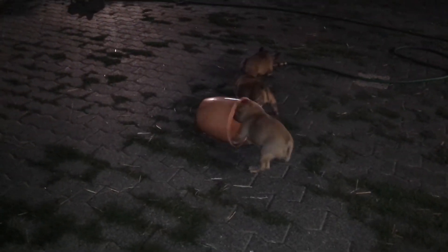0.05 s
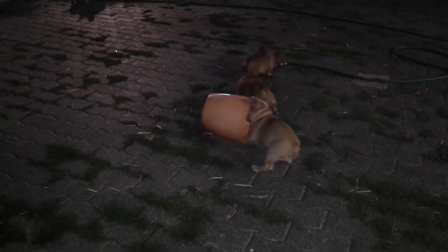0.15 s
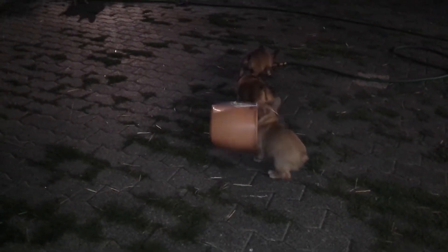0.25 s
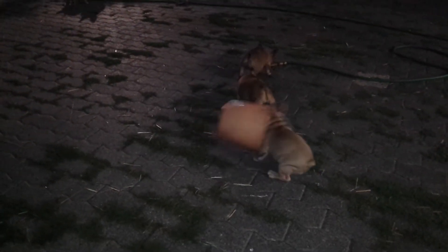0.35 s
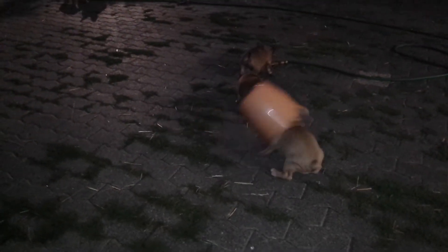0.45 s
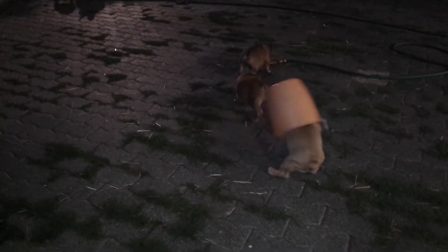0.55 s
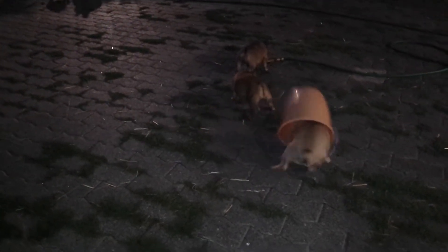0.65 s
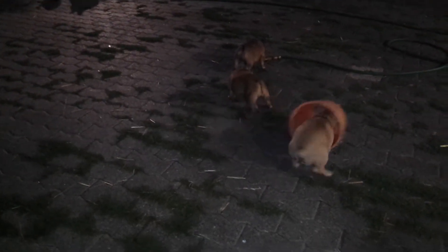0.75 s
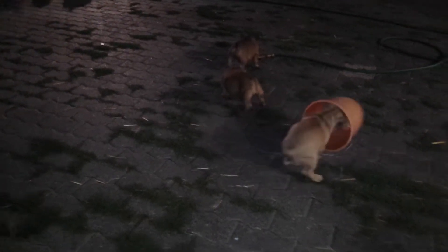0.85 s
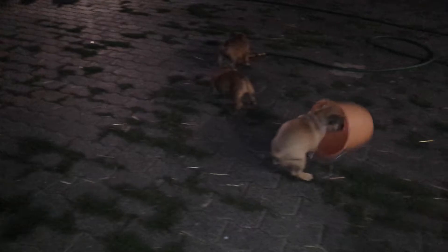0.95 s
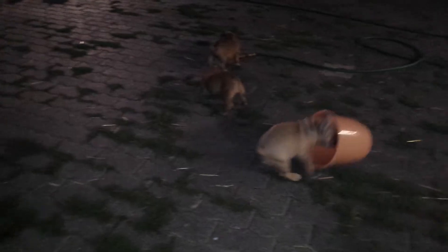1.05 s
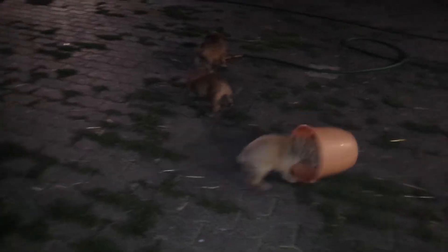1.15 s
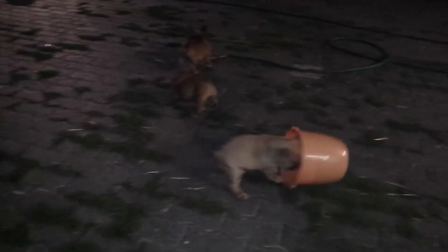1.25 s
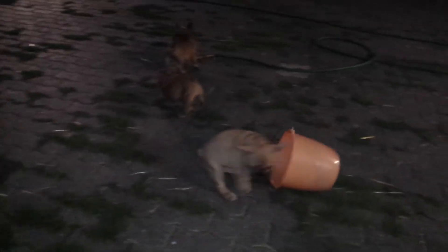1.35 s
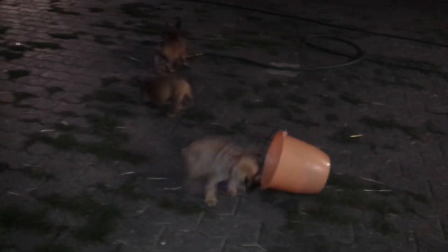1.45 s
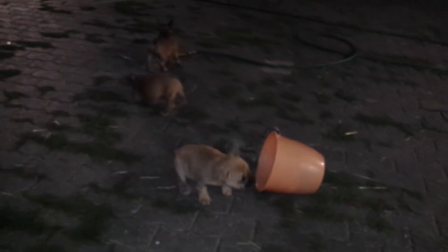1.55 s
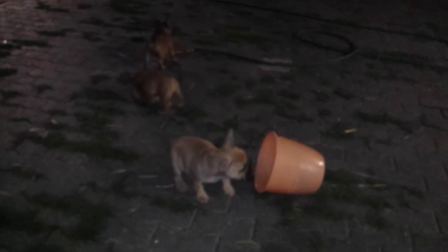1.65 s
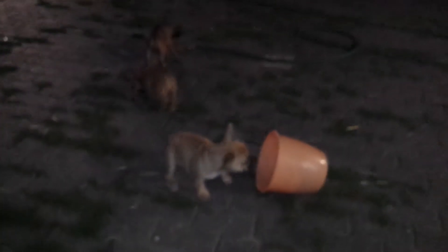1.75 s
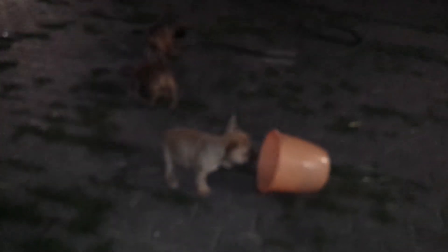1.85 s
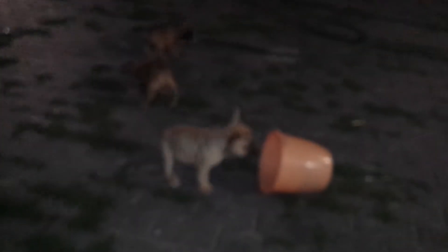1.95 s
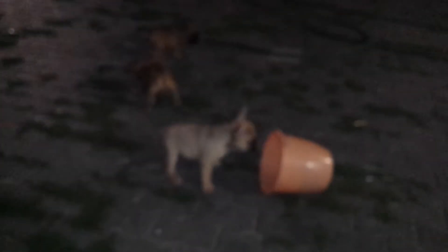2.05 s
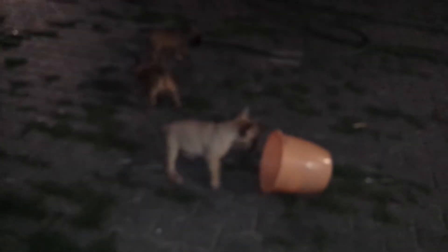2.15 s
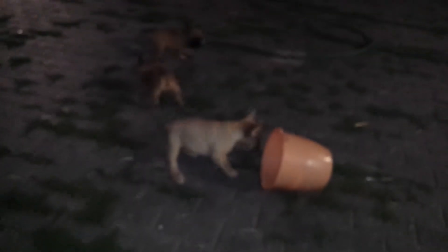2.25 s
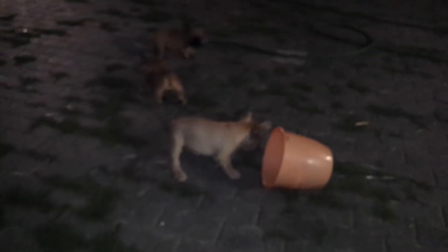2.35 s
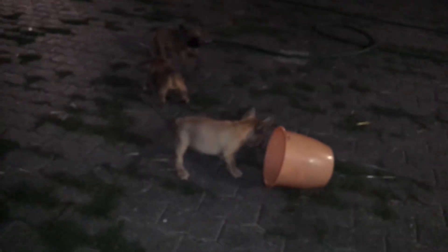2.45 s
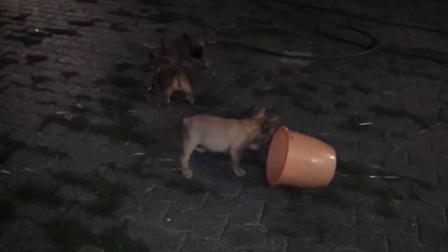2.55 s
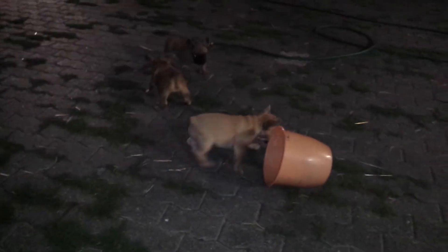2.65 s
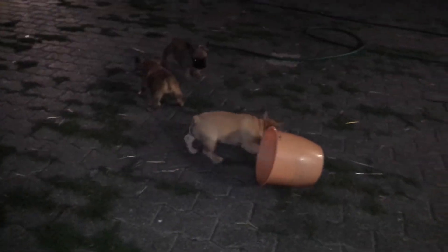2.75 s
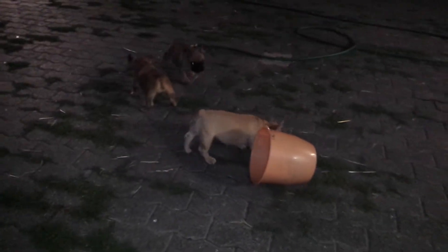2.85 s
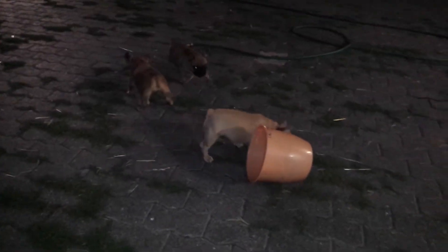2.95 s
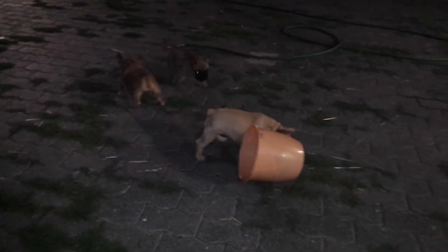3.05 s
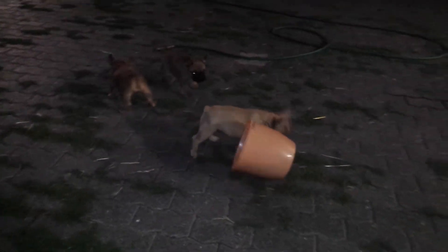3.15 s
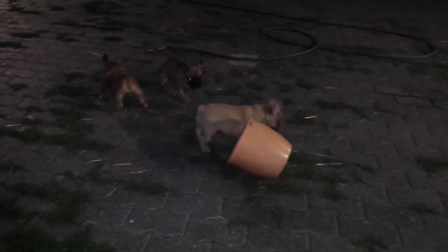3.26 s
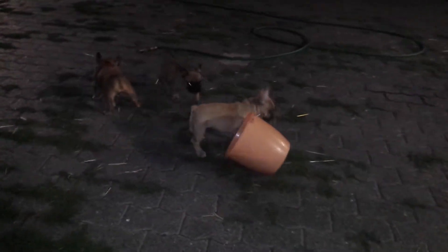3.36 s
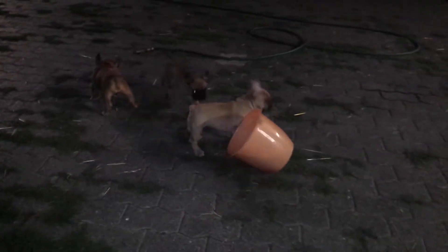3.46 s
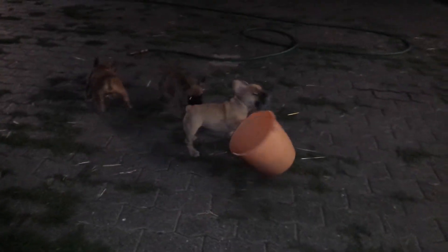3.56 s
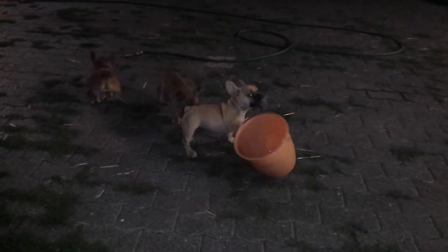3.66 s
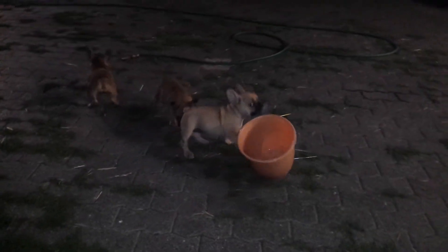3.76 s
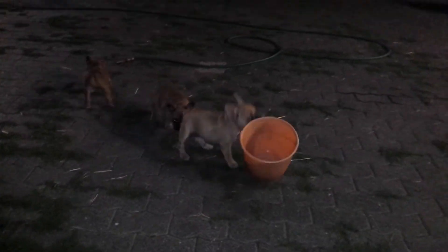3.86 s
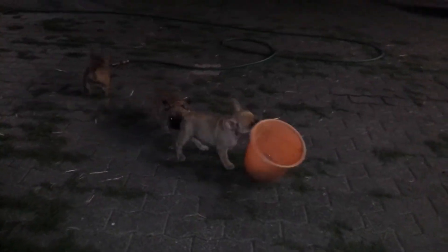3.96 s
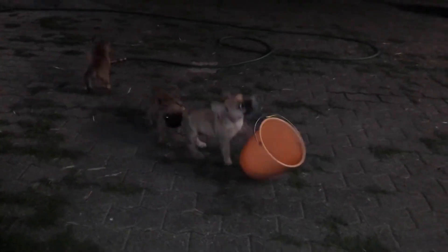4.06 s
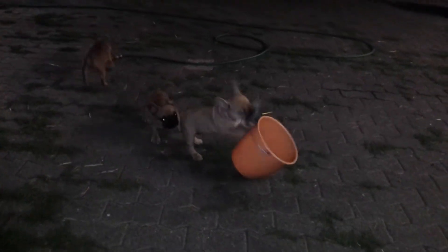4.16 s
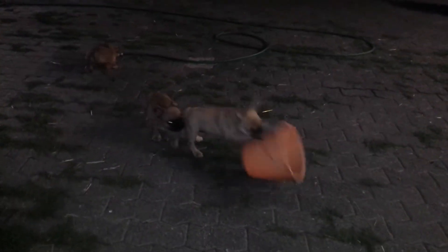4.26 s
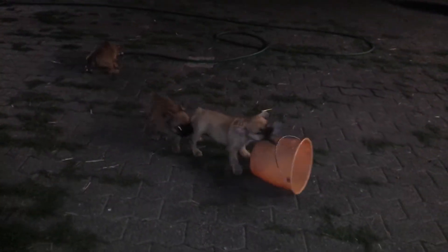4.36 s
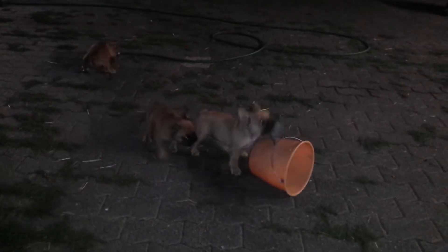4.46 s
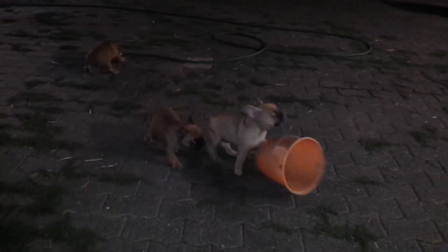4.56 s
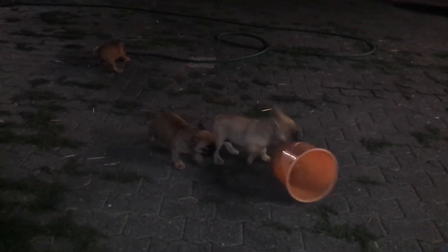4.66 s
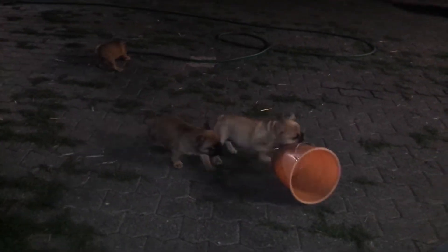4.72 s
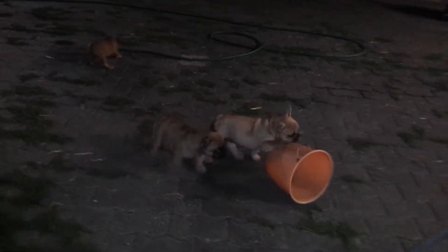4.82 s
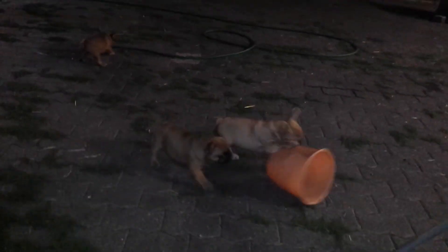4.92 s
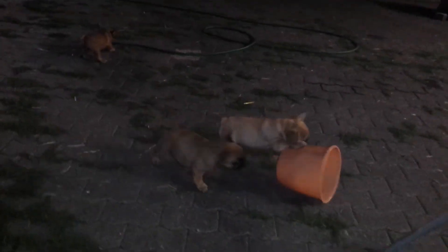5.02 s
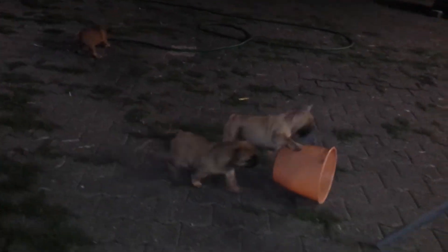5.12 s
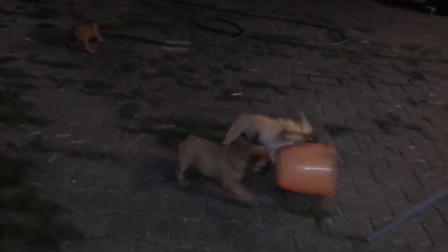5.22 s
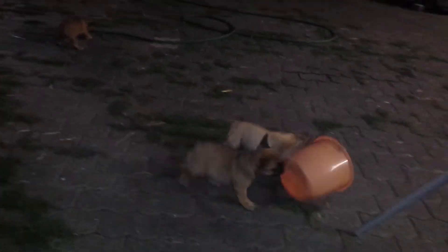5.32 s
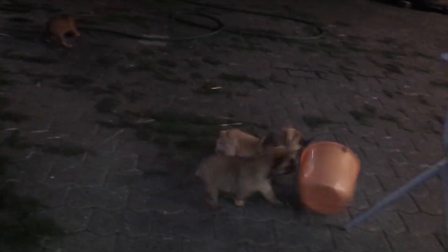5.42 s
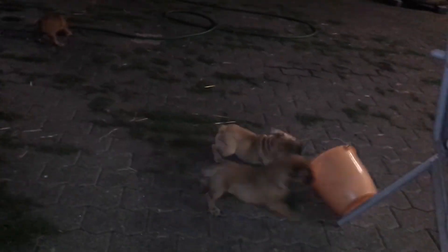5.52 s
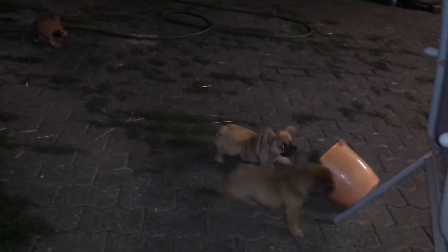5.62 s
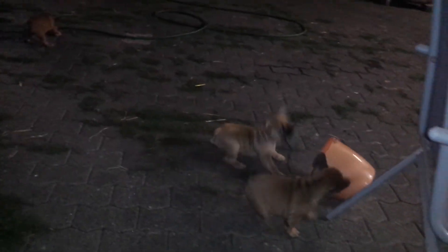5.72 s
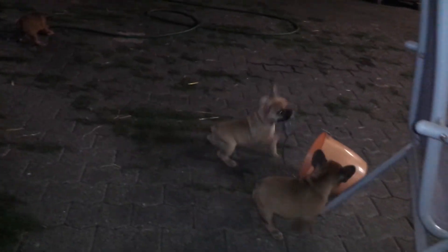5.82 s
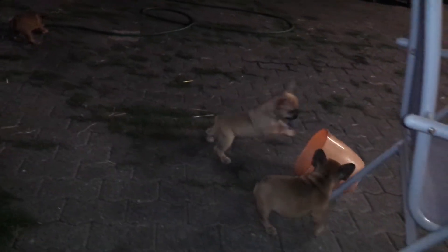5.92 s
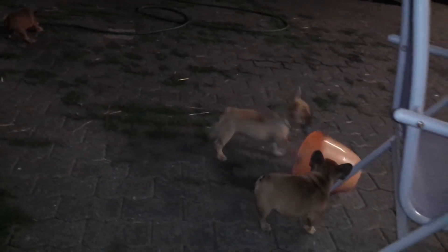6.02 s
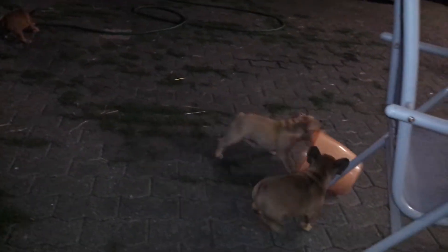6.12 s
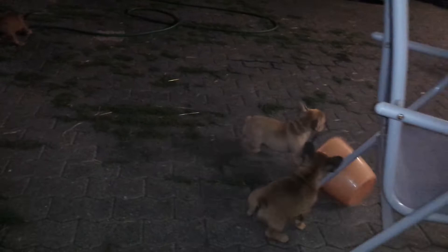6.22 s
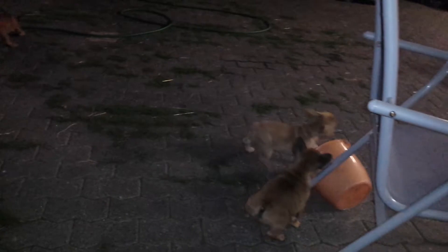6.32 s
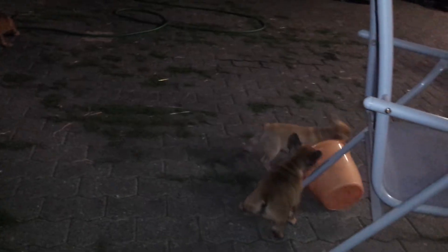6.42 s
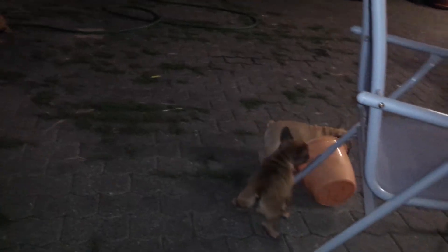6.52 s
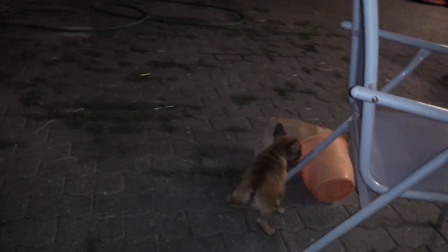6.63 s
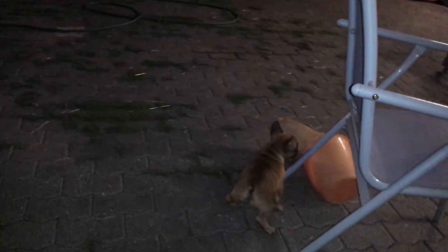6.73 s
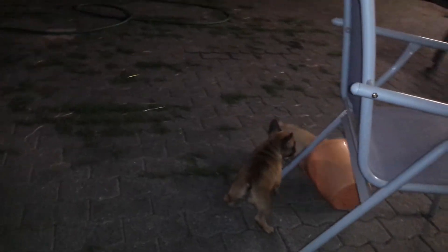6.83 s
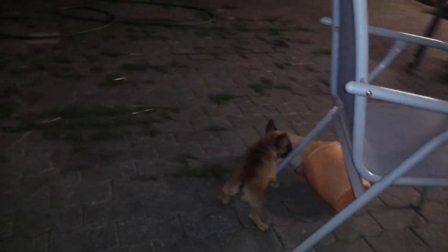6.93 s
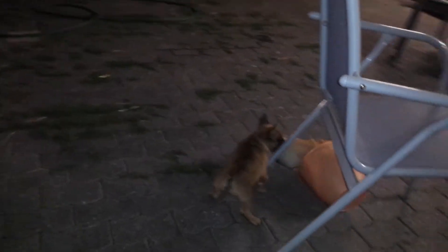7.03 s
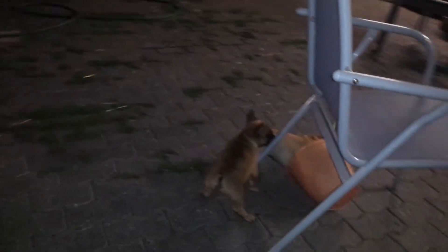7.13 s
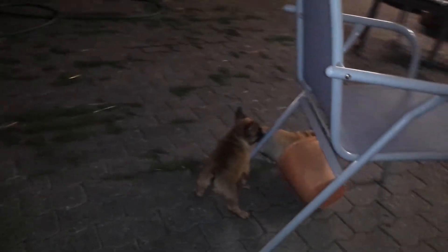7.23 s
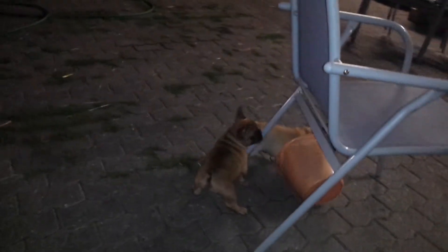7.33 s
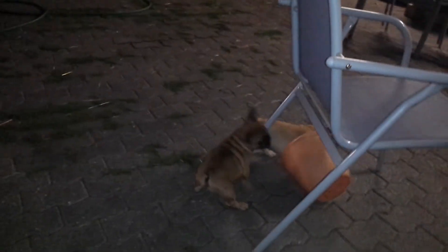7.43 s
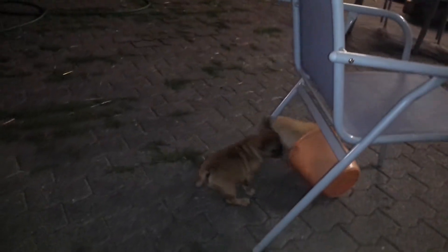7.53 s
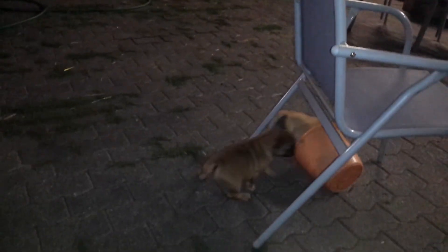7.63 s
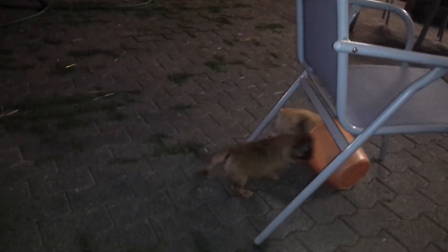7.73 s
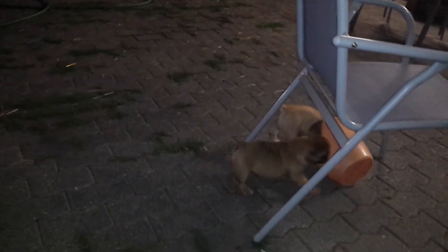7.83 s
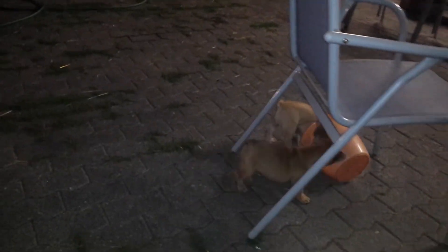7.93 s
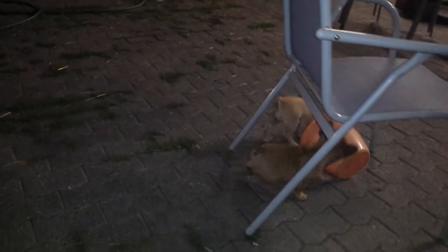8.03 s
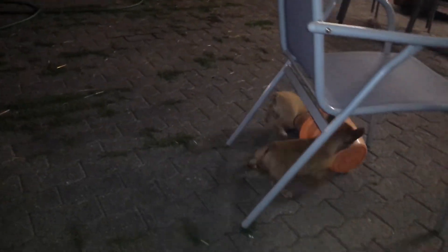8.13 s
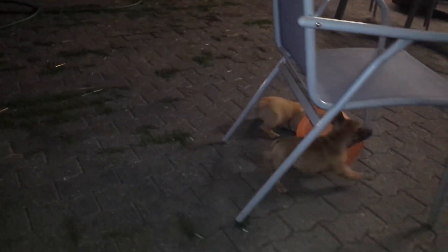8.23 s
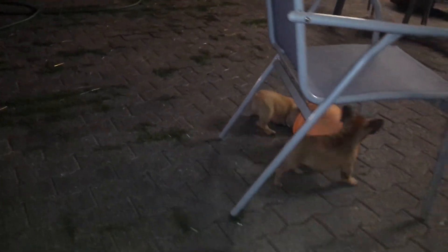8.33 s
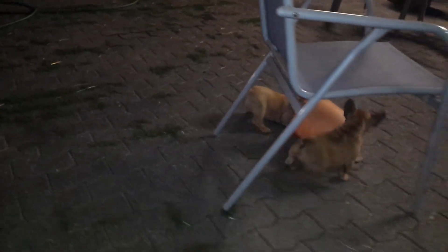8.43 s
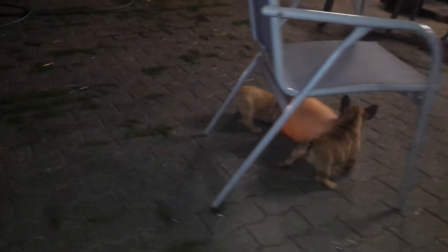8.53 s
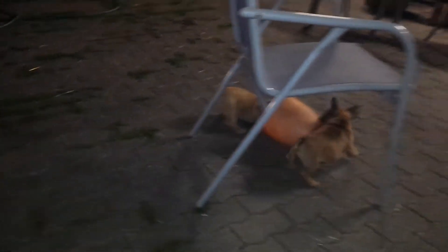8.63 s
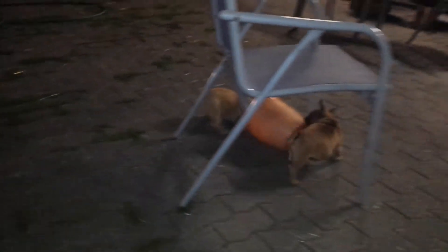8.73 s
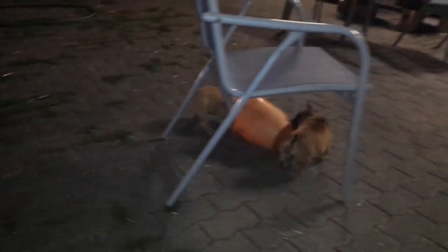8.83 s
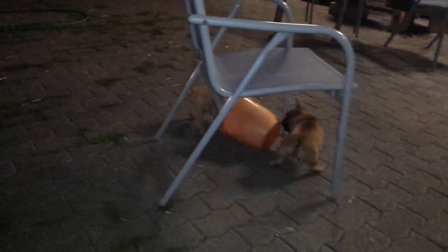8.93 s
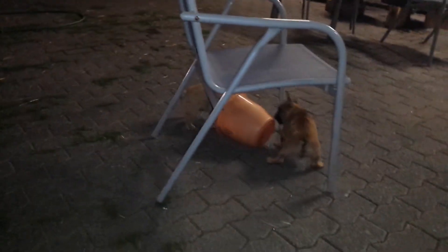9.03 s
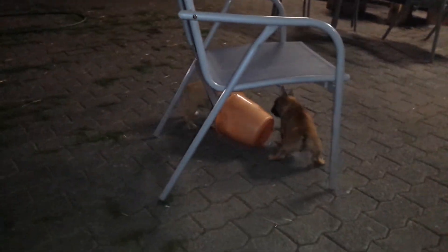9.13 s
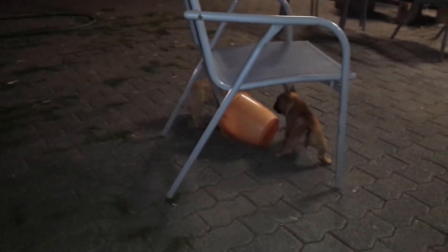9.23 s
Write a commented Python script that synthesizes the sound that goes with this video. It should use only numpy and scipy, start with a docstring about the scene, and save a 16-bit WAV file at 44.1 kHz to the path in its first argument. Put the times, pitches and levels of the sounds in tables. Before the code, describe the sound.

Close handheld stereo, one side muffled and the other bright: a light, hollow plastic pot bumps and drags over gritty paving stones. An opening clatter with deep drum-like pops gives way to soft scuffing and ticking claws, then a longer run of crowded knocks and harsh scrapes, thinning out to small taps. Still night air, low distant motor hum and brief wall reflections surround it.

```python
"""A patio at night, still air and a distant motor's hum; puppies shove a plastic flower pot over the paving.
First the pot clacks, scrapes and booms for some 1.4 s; then a lull of scuffs, ticks and a few knocks until 3.5 s.
From 4 s knocks and scrapes crowd together; the hum sinks after 8.25 s, and claws tick on past the last knock at 9 s.
Impulses ring modes of the pot, slips make its scrape, noise makes cracks and grit, and patio walls echo it all.
The left microphone is muffled, the right one bright."""
import sys
import numpy as np
from scipy import signal
from scipy.fft import rfft, irfft
from scipy.io import wavfile
from scipy.ndimage import uniform_filter1d

SR = 44100
rng = np.random.default_rng(int(sys.argv[2]) if len(sys.argv) > 2 else 0)


def dump(signal):
    """Clip the signal to [-1, 1] and save it as 16-bit WAV at the path in sys.argv[1]."""
    limited = np.clip(np.atleast_2d(signal).T, -1, 1)
    pcm = np.round(limited * 32767).astype(np.int16)
    wavfile.write(sys.argv[1], SR, pcm)


N = 409248
TIME = np.arange(N) / SR

# Night air. Each row: frequency in Hz, relative spectral level in dB per Hz.
AIR_SPECTRUM = [(15, -11), (45, -42), (75, -2), (120, 1.5), (200, -5.5), (300, -7.5), (450, -10),
                (900, -11), (1700, -19), (3500, -15), (5500, -12.5), (8000, -14), (15000, -13)]
# Partials of the distant motor. Each row: frequency in Hz, level in dB before the motor's level curve.
MOTOR_PARTIALS = [(113, -65.5), (169.5, -53.5), (339, -69.5)]
# The motor runs, then sinks. Each row: time in seconds, change of level in dB.
MOTOR_CURVE = [(0, 5), (2, 1), (3.5, 5), (7.9, 5), (8.25, 5), (8.5, -26), (9.28, -22)]
# Rumble of the hand on the camera. Each row: time in seconds, level in dB.
HAND_RUMBLE = [(0, -55), (1.2, -68), (2.3, -73), (3.2, -56.5), (4.2, -60), (5.5, -55), (6.2, -60),
               (7.4, -55), (8.2, -52.5), (8.8, -54), (9.28, -52)]
# Reverberation of the patio. Each row: frequency in Hz, time to fall 60 dB in seconds.
PATIO_DECAY = [(150, 0.72), (500, 0.45), (1500, 0.45), (4000, 0.44), (8000, 0.36), (15000, 0.49)]

# Paws and loose grit brush the paving. Each row: middle in seconds, length in seconds, level in dB, centre in Hz.
PAW_SCUFFS = [(0.331, 0.045, -25, 5260), (1.04, .04, -42, 11970), (1.783, .074, -53, 10000),
              (2.453, 0.069, -45, 3360), (2.565, .046, -48, 5100), (2.834, 0.033, -39, 10500),
              (2.993, 0.034, -36, 9900), (3.126, .016, -43, 1600), (3.345, .03, -33, 11000),
              (3.57, .066, -45, 1190), (3.693, 0.011, -41, 4600), (3.81, 0.1, -41, 9000),
              (4.15, 0.1, -37, 9000), (5.048, 0.12, -38, 5900), (6.53, 0.27, -42, 7700),
              (7.445, .14, -38.5, 7950), (7.888, 0.077, -42, 11000), (8.054, 0.082, -33.5, 9900),
              (8.428, 0.18, -38, 9250), (8.846, 0.054, -41.5, 7450), (9.091, 0.026, -41.5, 5100)]
# Claws and grit on the paving. Each row: start in seconds, level in dB before the layer trim.
CLAW_TICKS = [(.69, -40), (1.034, -44), (1.838, -46), (2.907, -40), (3.176, -35.5), (3.679, -31),
              (3.784, -30), (3.829, -32), (4.242, -29), (4.369, -28.5), (4.495, -30), (4.848, -26.5),
              (6.018, -34.5), (7.381, -37), (8.354, -33), (9.138, -38.5), (9.169, -38), (9.214, -34)]
# Bright snap of claw or grit. Each row: frequency in Hz, relative spectral level in dB per Hz.
TICK_SPECTRUM = [(600, -27), (1500, -3.5), (3000, 2.5), (5000, 0.5), (8000, 0.5), (12000, 0.5),
                 (16000, -5.5)]
# Treble crack of rim on stone. Each row: frequency in Hz, relative spectral level in dB per Hz.
CRACK_SPECTRUM = [(1500, -32), (2400, -26), (3100, 6), (4100, 2.5), (4900, 2), (5600, -7), (7500, -6),
                  (10000, -10.5), (15000, -38.5)]

# The base flexes and booms. Each row: start in seconds, level in dB, pitch in Hz, shift of the overtones in dB,
# time to fall 60 dB in seconds.
BASE_BOOMS = [(.196, -26, 199, -6, 0.084), (.458, -26, 194.5, 10, 0.12), (.749, -30.5, 195, -3, 0.24),
              (.837, -4.5, 198.8, -3, 0.13), (0.947, -24.5, 195, 7, 0.049), (1.088, -9, 205.5, -1, .16),
              (1.179, -3.5, 192, -5.5, 0.041), (1.254, -26, 184.5, 10, 0.11),
              (4.074, -27.5, 192, -27, 0.17), (4.59, -7.5, 234, -31, 0.067), (4.617, -15.5, 221, -4, .11),
              (4.954, -36, 201, 14, 0.13), (5.31, -34, 175, -9, 0.088), (5.55, -25, 198.6, 4, 0.12),
              (5.6, -13, 193.5, 3, 0.13), (6.028, -31.5, 199, -9, 0.22), (6.95, -25, 195, 5, .22),
              (7.278, -24.5, 178, -7, .087)]
# Air and base modes in a boom. Each row: multiple of its pitch, level in dB before the boom's own shift.
BOOM_OVERTONES = [(1.73, -5.5), (1.957, -5.5), (2.3, -40), (3.14, -26)]
# Modes of the pot's wall. Each row: frequency in Hz, height of the resonance in dB.
POT_MODES = [(200, 8), (290, -6), (345, 2.5), (395, 2.5), (480, -5), (560, -4.5), (640, 1), (730, -0.5),
             (830, -6.5), (980, -3.5), (1110, 3.5), (1240, 1.5), (1430, -8), (1610, 3), (1760, -1.5),
             (1880, -1), (2050, -8.5), (2230, 2), (2450, 0.5), (2700, -8), (2950, -5)]
SPLIT_HZ = 900  # parts the thud from the clack
RING_CYCLES = 22  # soft plastic loses 60 dB in this many swings

# Registers of the wall in Hz; which one rings most depends on where it touches the stone.
DEEP, LOW, MID, HIGH, SHARP = 850, 1080, 1470, 1820, 2230
# A puppy shoves the pot along. Each row: start in seconds, push in seconds, slide in seconds, rasp in dB,
# rumble above the rasp in dB, grit above the rasp in dB, register in Hz, share of that ring from 0 to 1;
# the three levels stand before the layer trims.
POT_SHOVES = [(0, .06, .04, -31, -1, -3, MID, 0.13), (0.178, .02, 0.033, -31.5, 1.5, -10, LOW, 0),
              (.322, .012, .1, -20.5, -1.5, -2, SHARP, 0.02), (.742, .012, .06, -29, -10, -6, MID, 0),
              (1.109, .014, .04, -27, 1, -22, MID, 0.5), (1.364, .012, .05, -28, 1, -16, LOW, 0.63),
              (1.398, .03, .02, -22.5, -9, -12.5, LOW, 0.67), (3.47, .09, .06, -49, -4, 5, HIGH, 0.5),
              (3.821, 0.018, .02, -36.5, 1.5, -1, MID, 0.1), (4.091, .012, 0.12, -32.5, -5, -6, SHARP, 0.4),
              (4.29, 0.013, .04, -33, -10, 0.5, MID, 0.3), (4.435, .015, 0.062, -33, -7, -4, MID, 0.44),
              (4.522, .02, 0.044, -24.5, 0, 0.5, LOW, 0.14), (4.72, .03, .05, -18.5, -3.5, -1, MID, 0.25),
              (4.936, .022, .045, -22, -1.5, -1, MID, 0.4), (5.12, .08, .14, -32.5, 1.5, 1, DEEP, .05),
              (5.321, .015, .07, -18.5, -2, -6, DEEP, 0.01), (5.445, .055, .07, -14, -4.5, -0.5, MID, 0.4),
              (5.543, .02, .04, -15.5, 1, 1.5, SHARP, .5), (5.61, .04, .06, -19.5, 1.5, -3, HIGH, 0.1),
              (5.73, .04, .12, -41, 6.5, 4, SHARP, 0.3), (5.848, 0.014, .03, -35.5, -9, -6, DEEP, 0.3),
              (6.123, .012, 0.044, -18.5, -20, -4, MID, .4),
              (6.208, 0.016, .06, -16, -15, -7.5, DEEP, 0.83), (6.25, .04, .06, -20, -3.5, 1, LOW, 0.5),
              (6.3, .025, .06, -20, -4, -2.5, MID, 0.56), (6.403, 0.018, .14, -32, 0.5, 2.5, LOW, 0.2),
              (6.668, .012, .07, -31, -4, -3, SHARP, .4), (6.742, .028, .06, -27, -1, 6, LOW, 1),
              (6.805, .025, 0.11, -18.5, -6.5, 0, HIGH, 0.3), (6.86, .13, .17, -16, -6.5, -6.5, HIGH, 0.73),
              (7.06, .025, .18, -23.5, -14, -1, HIGH, 0.8), (7.42, .03, 0.17, -36.5, 5.5, 2, LOW, 0.12),
              (7.533, .017, .04, -26, -1, -6, LOW, 0.98), (7.86, .06, .25, -36, -3.5, -8, LOW, 0.65),
              (8.027, .018, .03, -29.5, -2, -2, LOW, 1), (8.155, .05, 0.041, -20, -5, -3, LOW, 0.5),
              (8.26, .03, .06, -41.5, 5, 5, LOW, 0.2), (8.398, .02, 0.044, -24.5, -4, -10, LOW, 0.63),
              (8.56, .016, .06, -39, -1, -3, DEEP, 0.8), (8.729, .09, .035, -37, -1, -5, DEEP, 0.72),
              (8.973, .033, .035, -29, -3.5, 0.5, HIGH, .1)]
# A shove grips in GRIP_S seconds, builds by BUILD_DB through the push and drops SLIDE_DB per slide length.
GRIP_S, BUILD_DB, SLIDE_DB = .009, 7, 20
# Bumps in the stone rattle a sliding pot: dB above the untrimmed rasp, and spread either way in dB.
RATTLE_DB, RATTLE_SPREAD_DB = -1.5, 2.5
# The pot knocks on stone. Each row: start in seconds, clack in dB, thud above the clack in dB,
# crack above the clack in dB, register in Hz; the levels stand before the layer trims.
POT_KNOCKS = [(.022, -21.5, -23, 7, SHARP), (.161, -31.5, -21, -2, MID), (.317, -25, -6, 2, SHARP),
              (.462, -18.5, -5, -7.5, DEEP), (.539, -20.5, -22, -12, SHARP), (.724, -23, -3.5, -3, SHARP),
              (.767, -25.5, -18, -20, LOW), (.837, -18.5, -17, -5, DEEP), (.958, -31.5, -7, -1, MID),
              (1.089, -16, -5.5, -2.5, LOW), (1.176, -21, -22, 1.5, MID), (1.202, -15.5, -8, -2.5, MID),
              (1.361, -21, -5.5, -4.5, LOW), (2.089, -29.5, -0.5, -2.5, DEEP),
              (3.237, -21.5, -1.5, -0.5, DEEP), (3.597, -34, -5, 1.5, DEEP), (3.606, -28, -9, -10, DEEP),
              (3.871, -24, -4, 2, SHARP), (4.067, -24, -15, -3, SHARP), (4.075, -17, -2.5, -2.5, SHARP),
              (4.11, -25.5, -17, 3.5, SHARP), (4.23, -25, -25, -3.5, HIGH), (4.265, -26, -0.5, 1.5, SHARP),
              (4.293, -23.5, -4, -8, MID), (4.408, -23.5, -7.5, -1, MID), (4.417, -26.5, -3, 4.5, LOW),
              (4.483, -26, -1, -14, DEEP), (4.592, -17.5, -4.5, -0.5, SHARP), (4.677, -18.5, -9, -1.5, MID),
              (4.715, -12.5, -14, -2.5, MID), (4.743, -17, -9, 0, MID), (4.824, -23.5, -6, -1.5, SHARP),
              (4.921, -18.5, -6.5, -3, MID), (5.11, -37, -5, 17.5, MID), (5.172, -27.5, 2, -8, DEEP),
              (5.233, -20, -2, 2.5, LOW), (5.267, -21.5, -4.5, 4, MID), (5.312, -15, -1, -2.5, MID),
              (5.339, -22.5, 8.5, -8, DEEP), (5.439, -18.5, -2.5, 0, DEEP),
              (5.483, -17.5, -23, -0.5, SHARP), (5.601, -10, -7, -1.5, MID), (5.941, -35, -2, 2.5, MID),
              (5.958, -26, -10.5, -7, DEEP), (6.1, -25.5, -6, 3, LOW), (6.121, -19, -0.5, 2, DEEP),
              (6.151, -19, -17, -7, MID), (6.211, -26, 2, 5, DEEP), (6.471, -21.5, -8, -8, MID),
              (6.487, -23.5, -10, 0.5, SHARP), (6.636, -35, 5.5, 10, MID), (6.655, -14.5, -32, -7.5, HIGH),
              (6.665, -17.5, -10.5, -7, SHARP), (6.757, -14.5, -9, -12, LOW), (6.799, -11, -23, -6, HIGH),
              (7.012, -20, -29, 0, HIGH), (7.06, -16, -11.5, -3, MID), (7.513, -23, -5, -3, SHARP),
              (7.518, -17.5, -17, 1, SHARP), (7.601, -27, -16, -10, HIGH), (7.745, -15.5, -18, -1, HIGH),
              (7.929, -29.5, -7, -2.5, LOW), (7.974, -26, -8, -11, SHARP), (8.051, -20.5, -18, -13, LOW),
              (8.079, -36.5, 6, 17.5, LOW), (8.128, -20, -5, -1.5, LOW), (8.282, -24.5, -6, -1.5, LOW),
              (8.401, -30, 0.5, 1, LOW), (8.436, -27, -4, -12, LOW), (8.572, -47, 3, -9, DEEP),
              (8.638, -37, 0, 8.5, LOW), (8.777, -51, 20, 12, DEEP), (8.9, -18, -4, 3, HIGH),
              (8.961, -23.5, -4.5, -17, LOW)]

# Left microphone, muffled. Each row: frequency in Hz, response in dB.
LEFT_MICROPHONE = [(200, 2), (700, -2.5), (1300, -5), (1600, -4.5), (1900, -4), (2400, -12.5),
                   (4400, -13.5), (8000, -19.5), (15000, -26)]
# Right microphone, bright. Each row: frequency in Hz, response in dB.
RIGHT_MICROPHONE = [(200, 2.5), (4000, -2), (5600, 5), (6700, 12), (8000, 3), (10000, -2.5), (15000, -7.5)]
EDGE_HZ = 15600  # upper band limit of both microphones


def gain_of(db):
    """Decibels to amplitude."""
    return 10 ** (np.asarray(db) / 20)


def evened(x):
    """Scales to rms 1."""
    return x / np.sqrt(np.mean(x ** 2) + 1e-20)


def peaked(x):
    """Scales the loudest 4 ms to rms 1."""
    power = uniform_filter1d(x ** 2, size=176, mode="constant")
    return x / np.sqrt(power.max() + 1e-20)


def read(points, hz):
    """Reads a table on a log-frequency axis."""
    f, value = np.transpose(points)
    return np.interp(np.log(hz + 1), np.log(f + 1), value)


def add(mix, s, sound):
    """Mixes a sound in at time s, cut off at the end of the mix."""
    part = mix[..., max(round(s * SR), 0):][..., :sound.shape[-1]]
    part += sound[..., :part.shape[-1]]


def colour(x, points, size=2048):
    """Minimum-phase filter with the given spectrum, made by folding its cepstrum into positive time."""
    spectrum = gain_of(read(points, np.fft.rfftfreq(size, 1 / SR)))
    cepstrum = irfft(np.log(spectrum))
    cepstrum[1:size // 2] *= 2
    cepstrum[size // 2 + 1:] = 0
    response = irfft(np.exp(rfft(cepstrum)))
    return np.apply_along_axis(signal.oaconvolve, -1, x, response)[..., :x.shape[-1]]


def wander(per_s):
    """Random drift of rms 1, with nothing quicker than per_s swings a second."""
    slow = np.fft.rfftfreq(N, 1 / SR) < per_s
    return evened(irfft(rfft(rng.standard_normal(N)) * slow, N))


def resonate(x, hz, width):
    """A resonance of gain 1 that follows the curve hz: shift down to zero, smooth, shift back."""
    turn = np.exp(2j * np.pi * np.cumsum(hz) / SR)
    r = np.exp(-np.pi * width / SR)
    return 2 * (turn * signal.lfilter([1 - r], [1, -r], x / turn)).real


def night(air_db=-51, drift=0.0038, shared_hz=600):
    """Still night air, its bass shared by both microphones, and the drifting hum of a distant motor."""
    hz = np.fft.rfftfreq(N, 1 / SR)
    z = rfft(rng.standard_normal((2, N))) * gain_of(read(AIR_SPECTRUM, hz))
    same = 1 / (1 + (hz / shared_hz) ** 2)
    z[0] = same * z[1] + np.sqrt(1 - same ** 2) * z[0]
    air = gain_of(air_db) * evened(irfft(z, N))
    clock = np.cumsum(1 + drift * wander(7.4)) / SR
    running_db = np.interp(TIME, *np.transpose(MOTOR_CURVE)) + .6 * wander(5)
    hum = sum(gain_of(db) * np.sqrt(2) * np.sin(2 * np.pi * f * clock) for f, db in MOTOR_PARTIALS)
    return air + gain_of(running_db) * hum


def handling(low_hz=55, high_hz=130):
    """Dull rumble of the hand on the camera: low band-passed noise on a level curve."""
    band = signal.butter(2, [low_hz, high_hz], "bandpass", fs=SR, output="sos")
    rumble = signal.sosfilt(band, rng.standard_normal(N))
    return gain_of(np.interp(TIME, *np.transpose(HAND_RUMBLE))) * evened(rumble)


def patio(x, gap_s=0.022, shared_hz=700):
    """Weak scatter from the ground, then stronger echoes from the walls; both microphones share the bass."""
    t = np.arange(SR * 2 // 3) / SR
    # about 3000 random reflections a second, none in the first 3 ms
    taps = rng.standard_normal((2, len(t))) * (rng.random((2, len(t))) < 3000 / SR)
    taps *= np.interp(t, [0, gap_s * .8, gap_s], [.45, .45, 1]) * (t > .003)
    hz, when, z = signal.stft(taps, SR, nperseg=256)
    same = (1 / (1 + (hz / shared_hz) ** 4))[:, None]
    z[0] = same * z[1] + np.sqrt(1 - same ** 2) * z[0]
    # each frequency dies away at its own rate
    fade = gain_of(-60 * when / read(PATIO_DECAY, hz)[:, None])
    tail = signal.istft(z * fade, SR, nperseg=256)[1]
    tail /= np.linalg.norm(taps[1] * gain_of(-60 * t / read(PATIO_DECAY, 1500)))
    return signal.fftconvolve(x[None], tail, axes=1)[:, :N]


def scuffs(octaves=0.85, grain_db=4, level_db=0):
    """Paws and grit brush the paving: short swells of grainy noise, each in its own band."""
    out = np.zeros((2, N))
    grains = rng.standard_normal((2, N)) * gain_of(grain_db * wander(340))
    for middle, length, db, hz in PAW_SCUFFS:
        start = middle - length / 2
        swell = np.hanning(round(length * SR))
        sand = grains[:, round(start * SR):][:, :len(swell)]
        offset = np.log2((np.fft.rfftfreq(len(swell), 1 / SR) + 1) / hz)
        band = np.exp(-.5 * (offset / octaves) ** 2)
        brush = evened(irfft(rfft(sand) * band, len(swell)))
        add(out, start, gain_of(db + level_db) * swell * brush)
    return out


def ticks(level_db=-1):
    """Tiny dry snaps of claws and loose grit: bright noise that falls 60 dB in 20 ms."""
    out, t = np.zeros((2, N)), np.arange(SR // 20) / SR
    fade = gain_of(-60 * t / .02)
    for s, db in CLAW_TICKS:
        snap = colour(rng.standard_normal((2, len(t))) * fade, TICK_SPECTRUM)
        add(out, s, gain_of(db + level_db) * peaked(snap))
    return out


def booms(rise_s=0.0035):
    """The base pops like a drum skin and rings the air in the pot: decaying sines."""
    out, t = np.zeros(N), np.arange(SR // 2) / SR
    for s, db, hz, over_db, t60 in BASE_BOOMS:
        ring = np.sin(2 * np.pi * hz * t)
        for multiple, mode_db in BOOM_OVERTONES:
            overtone = np.sin(2 * np.pi * (multiple * hz * t + rng.random()))
            ring = ring + gain_of(over_db + mode_db) * overtone
        envelope = gain_of(db - 60 * t / t60) * (1 - np.exp(-t / rise_s))
        add(out, s, -envelope * ring)
    return out


def wall(t, centre_hz=None, focus_db=0, detune=.035, spot_db=1.5, apart_hz=1900):
    """Low and high ring of the pot at both microphones; each contact spot weights and bends the modes."""
    hz, db = np.transpose(POT_MODES)
    bend, weight, sign, lag = rng.standard_normal((4, len(hz)))
    if centre_hz:
        db = db - focus_db * abs(np.log2(hz / centre_hz))
    start = np.sign(sign) * hz * gain_of(db + spot_db * weight)
    cycles = np.outer(hz * (1 + detune * bend), t)
    # short waves reach the two microphones out of step
    out_of_step = np.outer([1, 0], lag * hz / apart_hz)[:, :, None]
    fade = gain_of(-60 * cycles / RING_CYCLES)
    modes = start[:, None] * fade * np.sin(out_of_step + 2 * np.pi * cycles)
    low, high = modes[:, hz < SPLIT_HZ], modes[:, hz >= SPLIT_HZ]
    return np.array([low.sum(1), high.sum(1)])


def shoving(judder_db=2, judder_per_s=90, roll=0.027, roll_per_s=18):
    """Levels of rumble, rasp and grit as the pot is shoved; the strongest shove sets the ring and its share."""
    clock = TIME[::32]  # a coarse clock is enough for the slow levels
    start, push, slide, db, rumble_db, grit_db, hz, share = np.transpose(POT_SHOVES)[:, :, None]
    t = clock - start
    fall_db = BUILD_DB * np.maximum(1 - t / push, 0) + SLIDE_DB * np.maximum(t - push, 0) / slide
    force = np.clip(t / GRIP_S, 0, 1) * gain_of(db - fall_db)
    levels = [np.linalg.norm(force * gain_of(above), axis=0) for above in (rumble_db, 0, grit_db)]
    strongest = force.argmax(axis=0)
    curves = (*levels, hz[strongest, 0], share[strongest, 0])
    rumble, rasp, grit, hz, share = (np.interp(TIME, clock, curve) for curve in curves)
    # the pot judders on the uneven stone, and its ring shifts as it rolls
    judder = gain_of(judder_db * wander(judder_per_s))
    ring_hz = hz * np.exp(roll * wander(roll_per_s))
    return rumble * judder, rasp * judder, grit * judder, ring_hz, share


def scrape(rumble, rasp, grit, hz, share, slips_per_s=560, uneven_db=4.5, sand=0.71, spit=0.84,
           slip_s=0.0048, width_hz=290, rumble_db=-6.0, rasp_db=-2, grit_db=-5, count=8):
    """The rim sticks and slips over the stone; every slip taps one of several spots of the wall."""
    share = np.clip(share, 0, 1)
    turns = np.cumsum(slips_per_s * np.exp(.7 * wander(250))) / SR
    slips = np.diff(np.floor(turns), prepend=0)
    slips = slips * gain_of(uneven_db * np.clip(rng.standard_normal(N), -2, 2))
    spot, t = rng.integers(0, count, N), np.arange(SR // 10) / SR
    low, high = sum(signal.oaconvolve((slips * (spot == k))[None, None], wall(t), axes=2)[..., :N]
                    for k in range(count))
    # pressed hard, one part of the wall sings out
    kicks = np.sqrt(slips) * rng.choice([-1, 1], N)
    singing = resonate(resonate(kicks, hz, 2 * width_hz), hz, 2 * width_hz)
    high = np.sqrt(1 - share) * evened(high) + np.sqrt(share) * evened(singing)
    # each slip also crushes sand
    crushing = evened(signal.lfilter([1], [1, -np.exp(-1 / (slip_s * SR))], slips))
    grains = rng.standard_normal((2, 2, N))
    crushed = evened(colour((sand + crushing) * grains[0], CRACK_SPECTRUM))
    # the hardest slips split grains and spit the brightest
    split = evened(colour(crushing ** 2 * grains[1], TICK_SPECTRUM))
    top = evened(crushed + spit * split)
    body = rumble * gain_of(rumble_db) * evened(low) + rasp * gain_of(rasp_db) * high
    return body + grit * gain_of(grit_db) * top


def rattle(rasp, thud_db=-7, crack_db=-3, count=32):
    """Small chance knocks, likelier and louder the harder the pot is scraping."""
    when, size, place = rng.random((count, 3)).T
    chance = np.sqrt(rasp)
    at = np.searchsorted(np.cumsum(chance), when * chance.sum())
    db = 20 * np.log10(rasp[at] + 1e-9) + RATTLE_DB + RATTLE_SPREAD_DB * (2 * size - 1)
    register = DEEP * (SHARP / DEEP) ** place
    return [(s, d, thud_db, crack_db, hz) for s, d, hz in zip(TIME[at], db, register)]


def knocks(blows, focus_db=6, crunch_s=0.0015, chatter=0.19, chatter_s=0.021, crack_t60=0.025,
           crack_rise_s=0.00063, grit_db=-5, thud_db=-1, clack_db=-0.5, crack_db=-3):
    """The rim lands with a short crunch and chatters on; this rings the wall and cracks in the treble."""
    out, t = np.zeros((2, N)), np.arange(SR // 16) / SR
    press = t / crunch_s * np.exp(1 - t / crunch_s) + chatter * np.exp(-t / chatter_s)
    snap_shape = gain_of(-60 * t / crack_t60) * (1 - np.exp(-t / crack_rise_s))
    for s, db, thud, crack, hz in blows:
        force = rng.standard_normal(len(t)) * press
        snap = rng.standard_normal((2, len(t))) * snap_shape
        low, high = (peaked(signal.fftconvolve(force[None], ring)[:, :len(t)])
                     for ring in wall(t, hz, focus_db))
        # a blow that is more crack than clack has caught a grain of grit, and is brighter
        grain = gain_of(grit_db + crack) * colour(snap[::-1], TICK_SPECTRUM)
        top = peaked(colour(snap, CRACK_SPECTRUM) + grain)
        body = gain_of(thud + thud_db) * low + gain_of(clack_db) * high
        add(out, s, gain_of(db) * (body + gain_of(crack + crack_db) * top))
    return out


def scene(room_db=-4.5, boom_room_db=-15, radiate_hz=110, boom_cut_hz=60):
    """Pot and paws on the patio; so small a pot radiates little bass."""
    rumble, rasp, grit, hz, share = shoving()
    blows = list(POT_KNOCKS) + rattle(rasp)
    thin = signal.butter(2, radiate_hz, "highpass", fs=SR)
    clack = signal.lfilter(*thin, knocks(blows))
    rub = signal.lfilter(*thin, scrape(rumble, rasp, grit, hz, share) + ticks() + scuffs())
    boom = signal.lfilter(*signal.butter(2, boom_cut_hz, "highpass", fs=SR), booms())
    # every side of the pot sends out its own mix of modes, so the echoes are fuller than the direct knock
    sides = signal.lfilter(*thin, [knocks(blows)[1] for _ in range(3)])
    echo = patio(gain_of(room_db) * (rub[1] + clack[1] / 2) + gain_of(boom_room_db) * boom)
    echo = echo + sum(patio(gain_of(room_db) * side / 2) for side in sides)
    return clack + rub + boom + echo + night() + handling()


def record(dry, hiss_db=-59.5):
    """Two unlike microphones, their own hiss, overload at 0.85 of full scale, and the band limit."""
    heard = np.array([colour(dry[0], LEFT_MICROPHONE), colour(dry[1], RIGHT_MICROPHONE)])
    heard = heard + gain_of(hiss_db) * rng.standard_normal((2, N))
    heard = np.clip(heard, -.85, .85)
    band = signal.firwin(255, EDGE_HZ, window=("kaiser", 9), fs=SR)
    return signal.oaconvolve(heard, band[None], "same")


dry = scene()
out = record(dry)
dump(out)
```